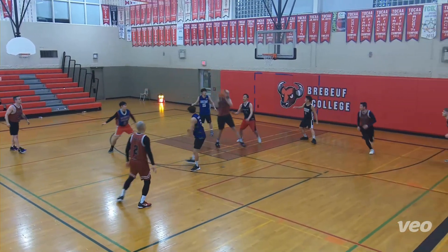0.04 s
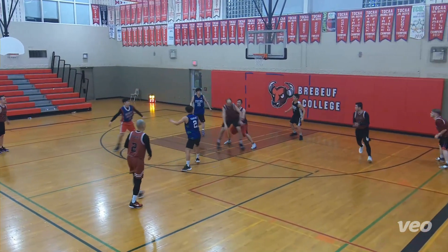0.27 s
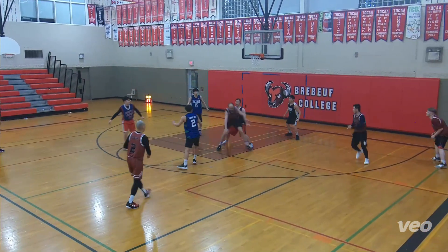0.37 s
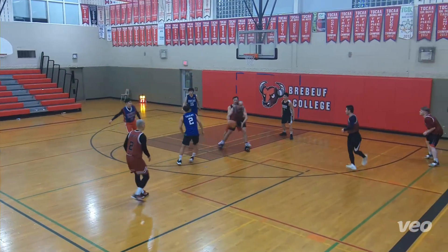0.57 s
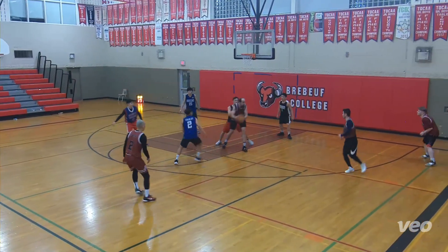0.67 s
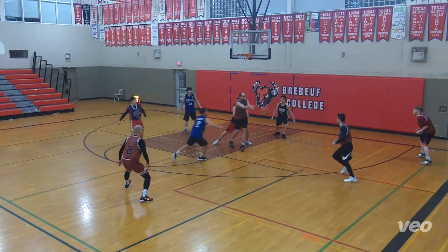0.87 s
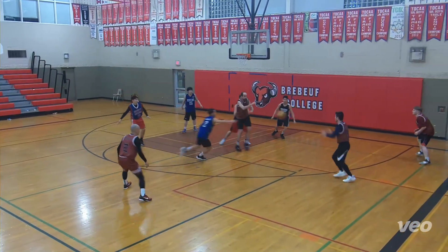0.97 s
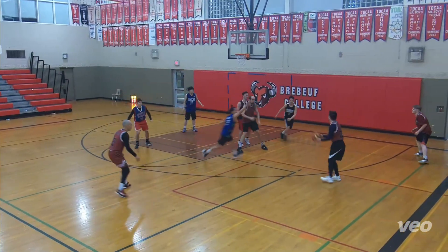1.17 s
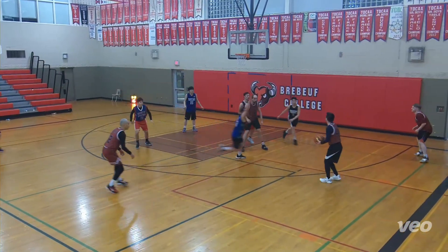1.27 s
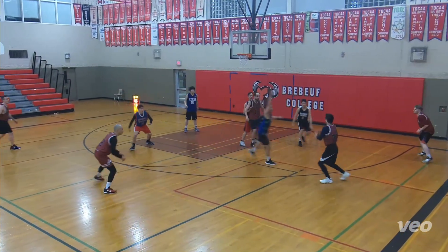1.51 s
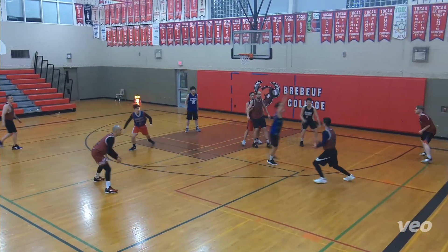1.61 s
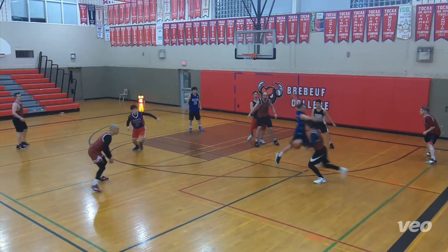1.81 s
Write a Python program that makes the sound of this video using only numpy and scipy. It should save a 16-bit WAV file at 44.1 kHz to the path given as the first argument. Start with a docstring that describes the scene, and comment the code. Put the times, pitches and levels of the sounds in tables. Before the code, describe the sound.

A basketball thumps on hardwood just after a bright, close hand slap on the right; short rubber sole squeaks and soft footfalls follow, then a fainter bounce, heard from the sideline of a large reverberant gym.

```python
"""A hand slap, close on the right: a bright crack of band-passed noise and a double pop of palm air modes.
A basketball bounces on hardwood: thump of floor modes, ring of air modes, smack of noise.
Rubber soles squeak as gliding jittered tones; feet land with thuds and noise scuffs.
Heard from the sideline of a large, live gym: wall echoes, a long noise tail and a steady noise wash."""
import sys
import numpy as np
from scipy import signal
from scipy.io import wavfile
from scipy.ndimage import uniform_filter1d

SR = 44100
rng = np.random.default_rng(int(sys.argv[2]) if len(sys.argv) > 2 else 0)


def materialize(psi):
    """Save the field psi as 16-bit PCM at rate SR to the path in sys.argv[1].

    A 1-D psi becomes a single channel; in a 2-D psi each row is a channel.
    """
    bounded = np.clip(np.atleast_2d(psi).T, -1, 1)
    quanta = np.round(bounded * 32767).astype(np.int16)
    wavfile.write(sys.argv[1], SR, quanta)


N = 81585
LEAD = SR // 4  # samples of play before the start; also lets the noise filters settle
AIR_TOP_HZ = 9850  # top of the squeaks, the hall tail and the wash


def from_db(db):
    """Amplitude gain of a level in dB."""
    return 10 ** (np.asarray(db) / 20)


def unit_energy(x):
    """Scale each row to energy 1."""
    return x / np.sqrt(np.sum(x ** 2, axis=-1, keepdims=True) + 1e-20)


def at_hz(points, hz):
    """Every column of a table, read on a log-frequency axis."""
    grid, *columns = np.transpose(points)
    return [np.interp(np.log(hz), np.log(grid), column) for column in columns]


def band(x, low_hz, high_hz):
    """Band-pass, kept below the Nyquist limit."""
    edges_hz = [low_hz, min(high_hz, SR / 2 - 100)]
    return signal.sosfilt(signal.butter(2, edges_hz, "band", fs=SR, output="sos"), x)


def low_pass(x, top_hz):
    """Steep elliptic cut of the top."""
    top_hz = min(top_hz, SR / 2 - 100)
    return signal.sosfilt(signal.ellip(10, .3, 70, top_hz, fs=SR, output="sos"), x)


def uneven(size, count):
    """Smooth random curve of spread 1 that changes about every count samples."""
    slow = rng.standard_normal(size)
    for _ in range(2):
        slow = uniform_filter1d(slow, size=count)
    return slow / slow.std()


def placed(sound, start_s):
    """A sound set on the scene's time line."""
    out = np.zeros(LEAD + N)
    start = max(LEAD + int(start_s * SR), 0)
    out[start:start + len(sound)] = sound[:len(out) - start]
    return out


def panned(x, pan_db):
    """Left-right level difference at constant total energy."""
    gains = from_db(np.array([pan_db, -pan_db]) / 2)
    return np.sqrt(2) * unit_energy(gains)[:, None] * x


def burst(rise_s, decay_s, low_hz, high_hz):
    """Brief contact noise: linear rise, exponential decay."""
    t = np.arange(SR // 10) / SR
    noise = band(rng.standard_normal(len(t)), low_hz, high_hz)
    rise = np.minimum(t / rise_s, 1)
    decay = np.exp(-np.maximum(t - rise_s, 0) / decay_s)
    return noise / noise.std() * rise * decay


def click(low_hz, high_hz):
    """A smooth band-limited click of unit energy."""
    return unit_energy(band(signal.unit_impulse(SR // 50), low_hz, high_hz))


def struck(modes):
    """Decaying modes of a struck body, in alternating polarity."""
    t = np.arange(SR // 4) / SR
    out = 0
    for k, (hz, db, t60_s) in enumerate(modes):
        out = out + (-1) ** k * from_db(db - 60 * t / t60_s) * np.sin(2 * np.pi * hz * t)
    return out


# diffuse field at the two microphones: (frequency [Hz], correlation [-1..1], left-right level [dB])
DIFFUSE_FIELD = [(100, 0.73, 3), (260, 0.94, -1), (580, -0.11, -2.2), (1090, -0.28, -0.5),
                 (2580, -0.095, -3), (5000, 0.41, -1.7), (9000, 0.88, -2.5)]


def diffuse_bands(size):
    """Half-octave bands of stereo noise, correlated as in a diffuse field."""
    edges_hz = 22 * 2 ** (np.arange(20) / 2)
    white = rng.standard_normal((2, 2, size + LEAD))
    for k, (low_hz, high_hz) in enumerate(zip(edges_hz, edges_hz[1:])):
        mid, side = band(white[k % 2], low_hz, high_hz)[:, LEAD:]  # neighbours use separate noise
        hz = np.sqrt(low_hz * high_hz)
        alike, pan_db = at_hz(DIFFUSE_FIELD, hz)
        alike = np.clip(alike, -1, 1)
        opposed = np.sqrt(1 - alike) * side * np.array([[1], [-1]])
        yield hz, panned(np.sqrt(1 + alike) * mid + opposed, pan_db)


# ventilation and distant play, relative spectrum: (frequency [Hz], density [dB per Hz])
WASH_SPECTRUM = [(30, -26), (65, -6), (110, -25), (180, -3.5), (300, -1), (550, -1), (1200, -6),
                 (2500, -12), (4000, -14), (7000, -17), (10000, -15.5)]
WASH_DB, WASH_WAVER_DB = -44.5, 2.5


def wash():
    """The hall's steady background noise, each band wavering a little."""
    out = 0
    for hz, noise in diffuse_bands(N):
        level_db = at_hz(WASH_SPECTRUM, hz)[0] + WASH_WAVER_DB * uneven(N, count=1800)
        out = out + noise * from_db(level_db)
    return from_db(WASH_DB) * out / out.std()


# hall tail, relative colour: (frequency [Hz], t60 [s], colour [dB])
HALL_TAIL = [(69.6, 2.4, -15.5), (184, 1.73, -6), (424, 1.25, 3.5), (926, 2, -10.5), (2380, 1.83, 5),
             (4040, 1.5, -2), (6730, 0.78, 8), (10600, 0.65, 2.5)]
# wall echoes: (nominal delay [s], left level [dB], right level [dB])
WALL_ECHOES = [(0.054, -27, -28), (0.098, -24, -35)]
HALL_GAP_S, HALL_BUILD_S = 0.0023, 0.0051
HALL_GRAIN_DB, HALL_PATCH_DB = 2.5, 2.3


def hall_response():
    """Wall echoes in a grainy, patchy noise tail whose decay depends on frequency, shortest at the top."""
    t = np.arange(2 * SR) / SR
    tail = 0
    for hz, noise in diffuse_bands(len(t)):
        t60_s, colour_db = at_hz(HALL_TAIL, hz)
        level_db = colour_db + HALL_PATCH_DB * uneven(len(t), count=1100)
        tail = tail + noise * from_db(level_db) * np.exp(-np.log(1000) * t / t60_s)
    tail = tail * from_db(HALL_GRAIN_DB * uneven(len(t), count=60))
    build = 1 - np.exp(-np.maximum(t - HALL_GAP_S, 0) / HALL_BUILD_S)
    out = unit_energy(tail * build)
    for delay_s, left_db, right_db in WALL_ECHOES:
        for side, db in enumerate((left_db, right_db)):
            arrival_s = delay_s + rng.uniform(-.001, .001)
            out[side, int(arrival_s * SR)] += from_db(db)
    return out


# sprung floorboards, relative levels: (frequency [Hz], level [dB], t60 [s])
BOARD_MODES = [(115, -5.5, .06), (186.4, 5, 0.066), (283, 5.5, 0.035), (407, -10.5, 0.033)]


def thump(push_s):
    """A soft half-sine push sets the floorboards ringing; peak 1."""
    t = np.arange(SR // 50) / SR
    push = np.sin(np.pi * np.minimum(t / push_s, 1))
    boards = np.convolve(struck(BOARD_MODES), push)
    return boards / np.abs(boards).max()


# shoes land, levels before the path gains: (time [s], thud [dB], scuff [dB], scuff centre [Hz])
LANDINGS = [(-.12, -25.5, -52, 500), (.01, -57, -38, 424), (0.086, -34, -46, 500), (.235, -35, -42, 400),
            (0.653, -32.5, -34, 510), (0.733, -37, -37, 397), (.94, -38, -44.5, 424),
            (1.108, -33, -34.5, 1625), (1.168, -38.5, -33, 1025), (1.195, -35, -32.5, 390),
            (1.36, -39.5, -51, 533), (1.547, -31, -50, 443), (1.716, -30.5, -58, 445)]
STEP_PUSH_S, SCUFF_RISE_S, SCUFF_DECAY_S = .0035, .003, 0.0071
SCUFF_SPREAD = 1.186  # band edge / centre frequency ratio
STEP_DIRECT_DB, STEP_HALL_DB = -2.5, 2.5  # the feet are far off, heard mostly through the hall


def steps():
    """Each landing thuds on the boards with a short noise scuff. Yields (direct, into the hall)."""
    for time_s, thud_db, scuff_db, hz in LANDINGS:
        scuff = burst(SCUFF_RISE_S, SCUFF_DECAY_S, low_hz=hz / SCUFF_SPREAD, high_hz=hz * SCUFF_SPREAD)
        thud = placed(from_db(thud_db) * thump(STEP_PUSH_S), time_s)
        step = thud + placed(from_db(scuff_db) * scuff, time_s)
        yield from_db(STEP_DIRECT_DB) * panned(step, pan_db=-7.0), from_db(STEP_HALL_DB) * step


SQUEAK_ARCH = 0.46  # exponent of the sine envelope
CHATTER_DB, OVERTONE_FALL_DB = 2.5, -0.5


def squeak(length_s, start_hz, end_hz, overtone_db, jitter):
    """Stick-slip of rubber: a gliding, chattering tone, two overtones and rub noise scaled by the jitter."""
    t = np.arange(SR // 10) / SR
    glide_hz = np.interp(t, [0, length_s], [start_hz, end_hz])
    hz = glide_hz * (1 + jitter * uneven(len(t), count=28))
    phase = 2 * np.pi * np.cumsum(hz) / SR
    tone = np.sin(phase)
    for k in range(2):
        tone = tone + from_db(overtone_db + k * OVERTONE_FALL_DB) * np.sin((k + 2) * phase)
    rub = jitter * band(rng.standard_normal(len(t)), low_hz=3020, high_hz=10000)
    arch = np.abs(np.sin(np.pi * np.minimum(t / length_s, 1))) ** SQUEAK_ARCH
    chatter = from_db(CHATTER_DB * uneven(len(t), count=80))
    return low_pass(arch * chatter * (tone + rub), AIR_TOP_HZ)


# soles stick and slip: (time [s], length [s], start [Hz], end [Hz], level [dB],
# first overtone re tone [dB], pitch jitter [share], left-right level [dB])
SOLE_SLIPS = [(-.04, .05, 3743, 3542, -36, -26.5, 0.031, -15),
              (0.201, 0.012, 5025, 4630, -27.5, -20, 0.022, -11),
              (0.213, 0.045, 4860, 4687, -31, -14, 0.018, -17),
              (0.241, 0.0076, 3550, 3280, -38, -8, 0.017, -1),
              (0.25, 0.0066, 3474, 3440, -21.5, -16.5, 0.0059, -12.5),
              (.677, 0.011, 4105, 4234, -26, -14, 0.0042, -10),
              (.729, 0.026, 4156, 4270, -32.5, -11.5, 0.0055, -12),
              (1.0223, 0.0057, 5690, 5500, -27.5, -23, 0.011, -11),
              (1.033, 0.032, 5760, 5600, -33, -32, 0.03, -8),
              (1.103, 0.018, 3987, 3684, -33, -1, 0.019, -6.5),
              (1.113, 0.0153, 3230, 2983, -29.5, -1, 0.016, -12),
              (1.143, 0.019, 3830, 3480, -34, -5.5, .018, -21),
              (1.155, 0.023, 3182, 3254, -28.5, -6, 0.012, -4),
              (1.167, .011, 3160, 3265, -28, -8, 0.0084, -9),
              (1.246, 0.037, 3230, 3250, -33, -35, 0.016, 0),
              (1.464, 0.026, 3842, 3700, -34.5, -4.5, 0.014, -7),
              (1.639, 0.0736, 9700, 9540, -44.5, -40, 0.014, -23)]
SQUEAK_HALL_DB = 1


def squeaks():
    """Soles radiate a little differently to either side of the hall. Yields (direct, into the hall)."""
    for time_s, length_s, start_hz, end_hz, db, overtone_db, jitter, pan_db in SOLE_SLIPS:
        sides = []
        for _ in range(2):
            sound = squeak(length_s, start_hz, end_hz, overtone_db, jitter)
            sides.append(from_db(db) * placed(sound, time_s))
        yield panned(sides[1], pan_db), from_db(SQUEAK_HALL_DB) * np.array(sides)


# ball meets floor: (time [s], thump [dB], smack [dB], ring [dB])
BALL_HITS = [(0.3692, -21, -17, -29), (1.2744, -26.5, -71, -38)]
# air inside the ball, relative levels: (frequency [Hz], level [dB], t60 [s])
BALL_AIR_MODES = [(533, 2.5, 0.052), (712, 0, 0.055), (1000, -2, 0.032), (1153, -17, .03),
                  (1650, -3.5, 0.017), (2050, -16, 0.09)]
PUSH_DELAY_S, PUSH_S = .0015, 0.0039
SMACK_RISE_S, SMACK_DECAY_S = 0.00042, 0.0042
THUMP_HALL_DB, SMACK_HALL_DB, RING_HALL_DB = 9.5, 2.5, 6


def bounces():
    """Skin smacks the varnish, the air inside rings, the boards thump. Yields (direct, into the hall)."""
    for time_s, thump_db, smack_db, ring_db in BALL_HITS:
        boards = placed(from_db(thump_db) * thump(PUSH_S), time_s + PUSH_DELAY_S)
        ring = placed(from_db(ring_db) * struck(BALL_AIR_MODES), time_s)
        noise = burst(SMACK_RISE_S, SMACK_DECAY_S, low_hz=2660, high_hz=14000)
        smack = placed(from_db(smack_db) * noise, time_s)
        sent = from_db(THUMP_HALL_DB) * boards + from_db(RING_HALL_DB) * ring
        sent = sent + from_db(SMACK_HALL_DB) * smack
        yield boards + ring + panned(smack, pan_db=-6.0), sent


# crack of skin, by band: (low edge [Hz], high edge [Hz], direct level [dB], energy into the hall [dB])
SKIN_CRACK = [(1830, 5630, -24, 6), (6480, 22400, -10.5, 9.5)]
# air trapped under the palm, relative levels: (frequency [Hz], level [dB], t60 [s])
PALM_AIR_MODES = [(803, 6, 0.029), (1255, 0, 0.03), (1860, -8.5, 0.016)]
SLAP_AT_S, SLAP_RISE_S, SLAP_DECAY_S, CRACK_PAN_DB = .3027, 0.000847, 0.0066, -27
POP_DB, POP_PAN_DB, POP_HALL_DB = -17, -2, -1.5
POP_LAG_S, POP_AGAIN_S, POP_AGAIN_DB = 0.00053, 0.00325, -7
PALM_HALL_DB = 10  # energy of the palm's dull knock into the hall


def slap():
    """Crack of skin and double pop of palm air, later at the left microphone. Yields (direct, into the hall)."""
    for low_hz, high_hz, direct_db, hall_db in SKIN_CRACK:
        crack = from_db(direct_db) * burst(SLAP_RISE_S, SLAP_DECAY_S, low_hz, high_hz)
        sent = placed(from_db(hall_db) * click(low_hz, high_hz), SLAP_AT_S)
        yield panned(placed(crack, SLAP_AT_S), CRACK_PAN_DB), sent
    palm_air = band(struck(PALM_AIR_MODES), low_hz=450, high_hz=4130)
    pop = placed(from_db(POP_DB) * palm_air, SLAP_AT_S + SLAP_RISE_S)
    second_pop = from_db(POP_AGAIN_DB) * np.roll(pop, int(POP_AGAIN_S * SR))
    left, right = panned(pop + second_pop, POP_PAN_DB)
    late_left = np.roll(left, int(POP_LAG_S * SR))
    knock = placed(from_db(PALM_HALL_DB) * click(low_hz=345, high_hz=1836), SLAP_AT_S)
    yield np.array([late_left, right]), from_db(POP_HALL_DB) * pop + knock


def scene():
    """Direct sound, the hall's answer and the background."""
    direct, sent = map(sum, zip(*squeaks(), *bounces(), *steps(), *slap()))
    tail = signal.fftconvolve(sent, hall_response(), axes=1)
    return direct[:, LEAD:] + low_pass(tail[:, LEAD:LEAD + N] + wash(), AIR_TOP_HZ)


BASS_CUT_HZ, CUTOFF_HZ = 66, 11000


def record(dry):
    """The microphones lose the deep bass; the top is cut steeply."""
    high_pass = signal.butter(2, BASS_CUT_HZ, "high", fs=SR, output="sos")
    return low_pass(signal.sosfilt(high_pass, dry), CUTOFF_HZ)


dry = scene()
out = record(dry)
materialize(out)
```